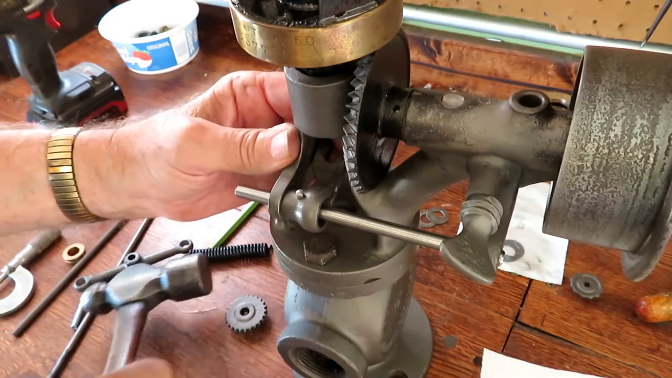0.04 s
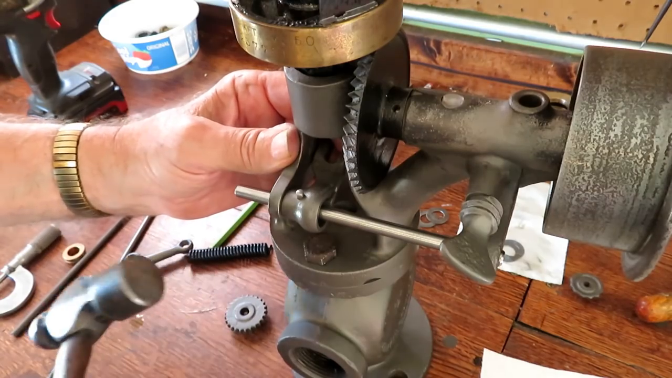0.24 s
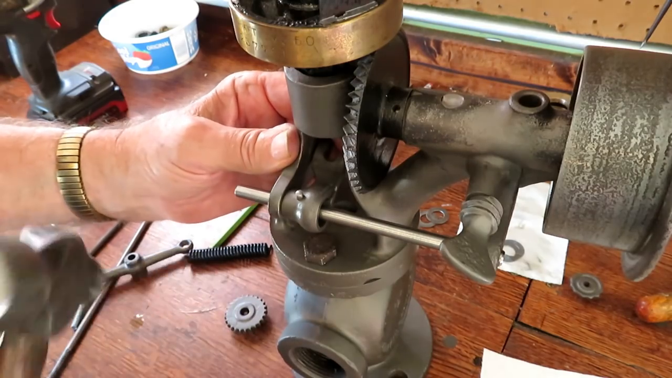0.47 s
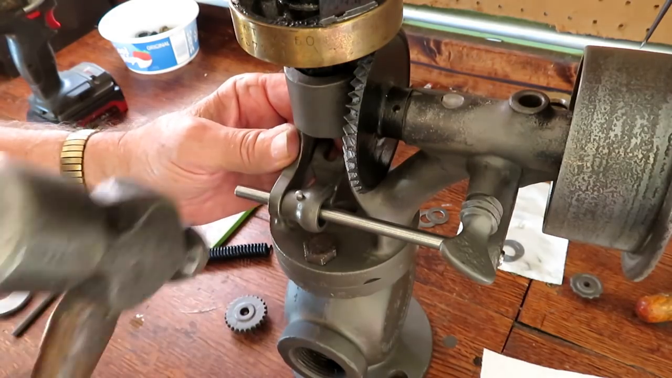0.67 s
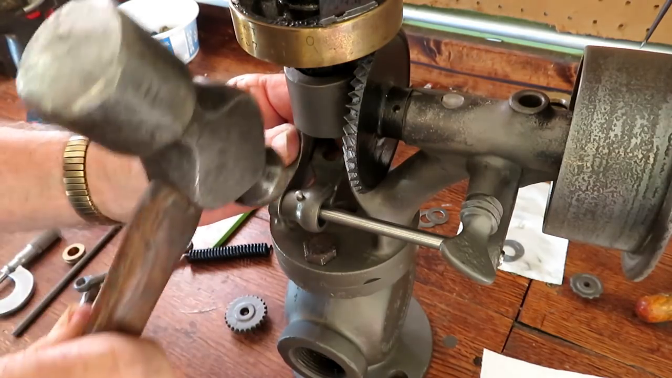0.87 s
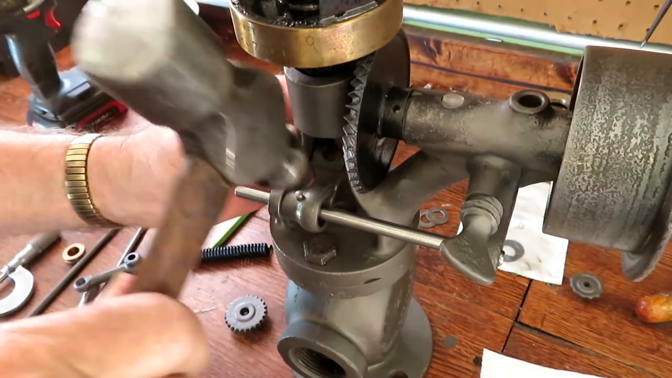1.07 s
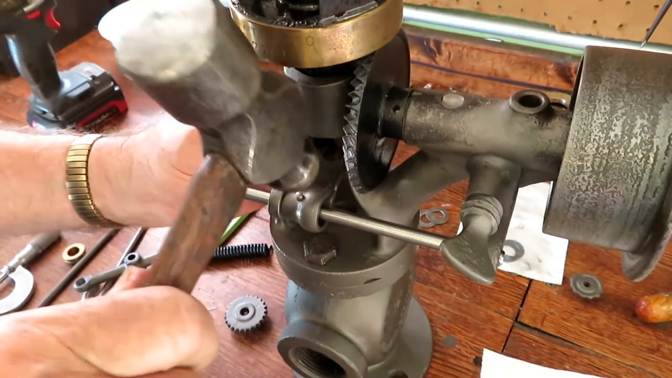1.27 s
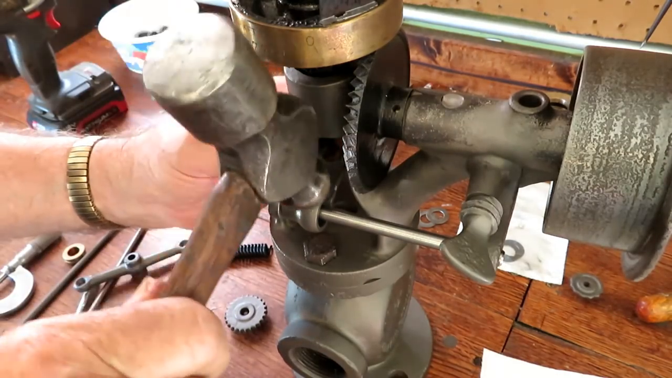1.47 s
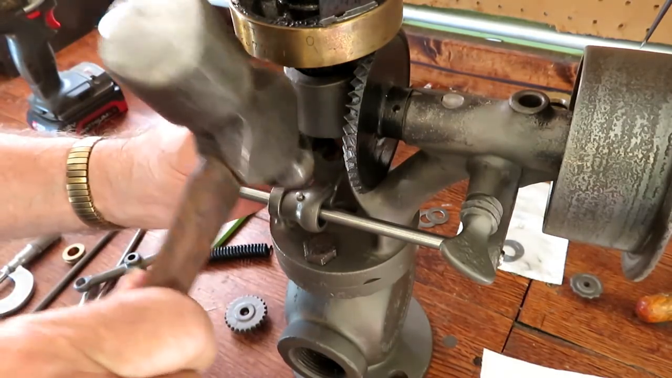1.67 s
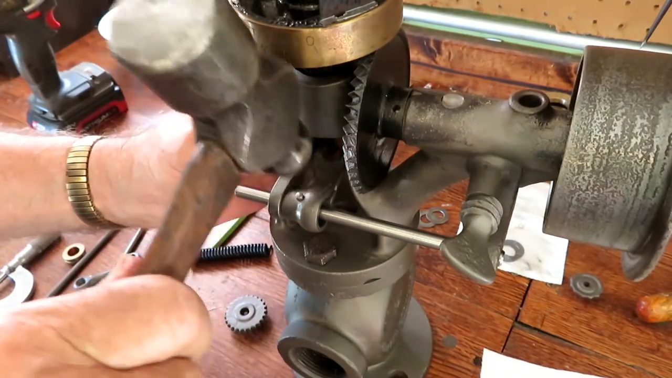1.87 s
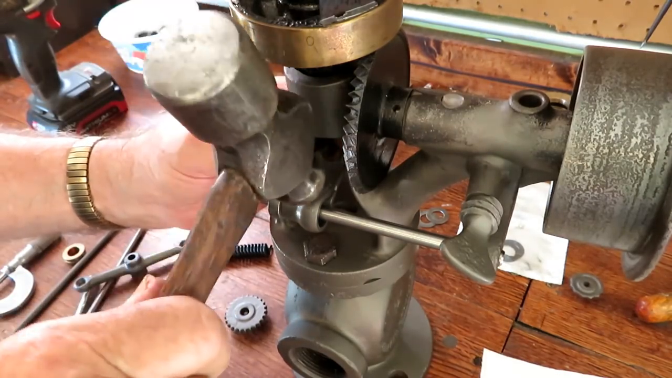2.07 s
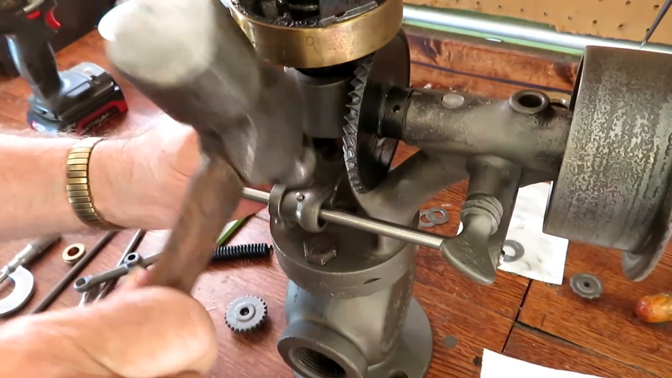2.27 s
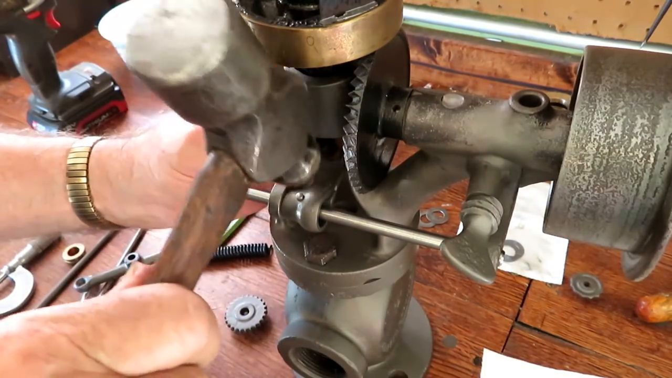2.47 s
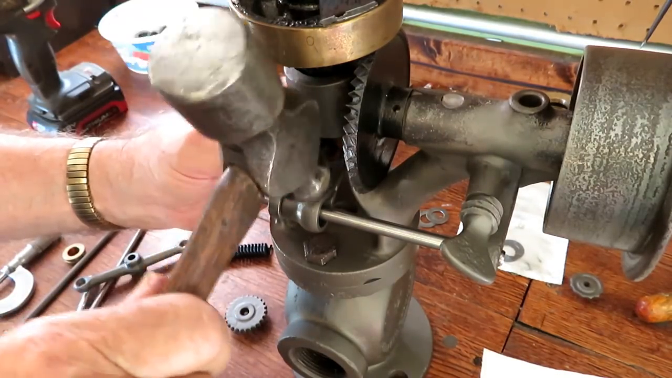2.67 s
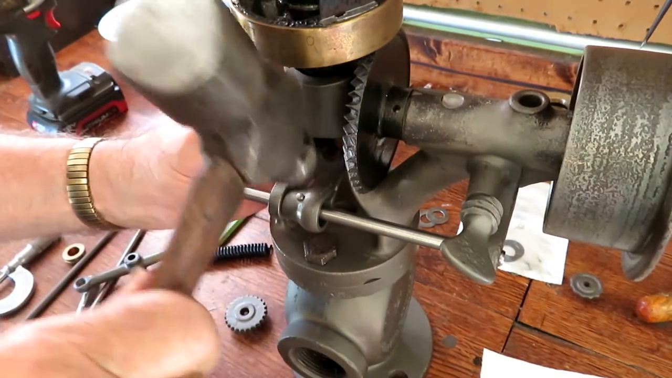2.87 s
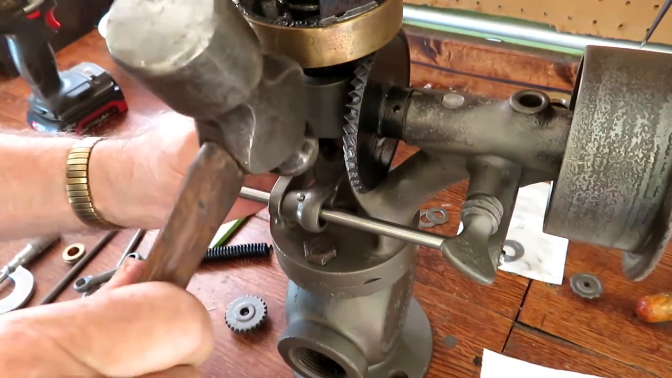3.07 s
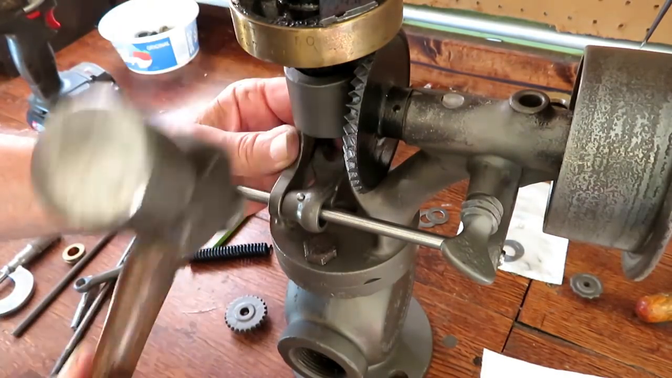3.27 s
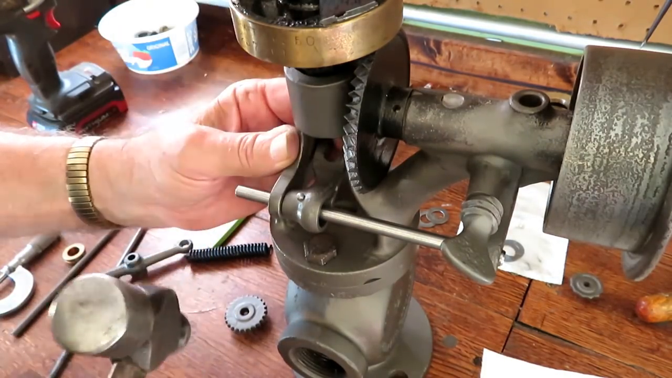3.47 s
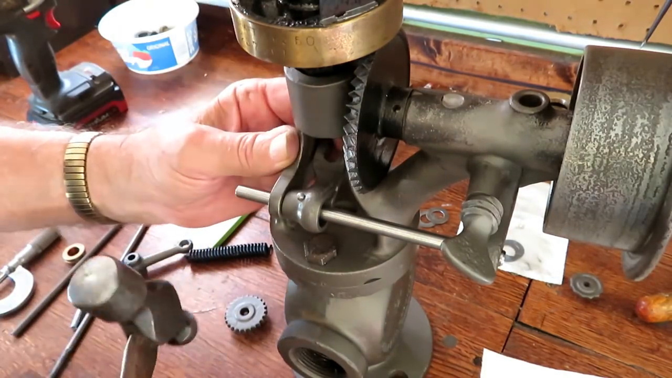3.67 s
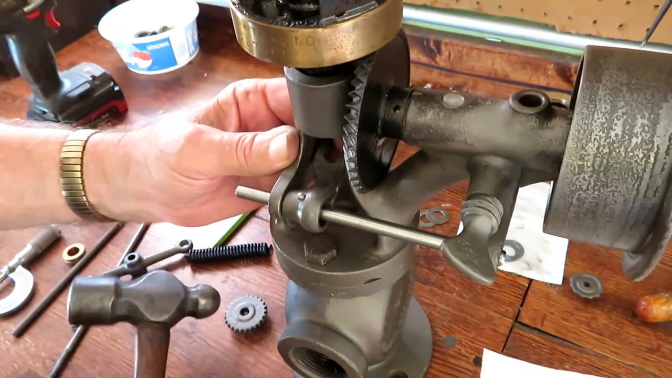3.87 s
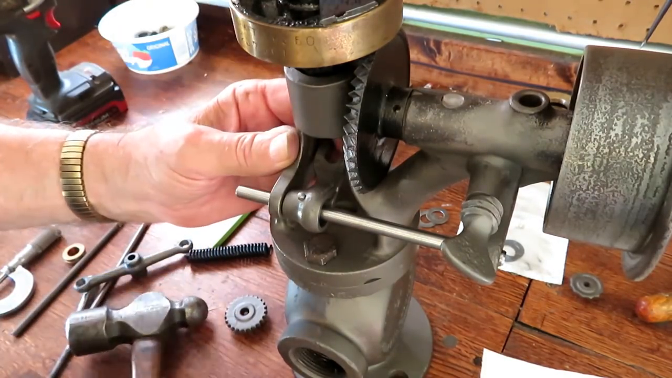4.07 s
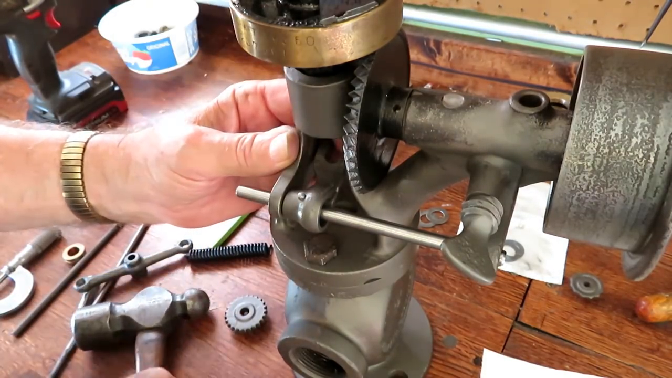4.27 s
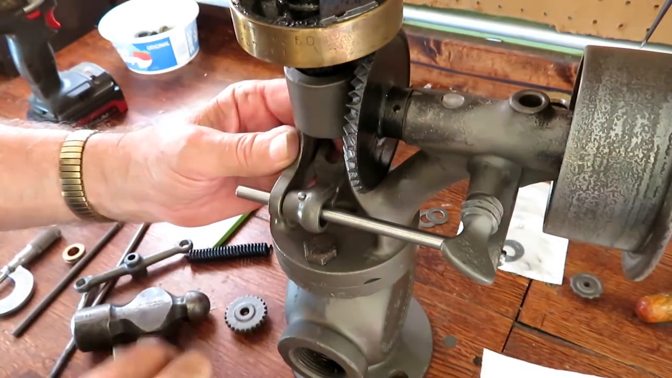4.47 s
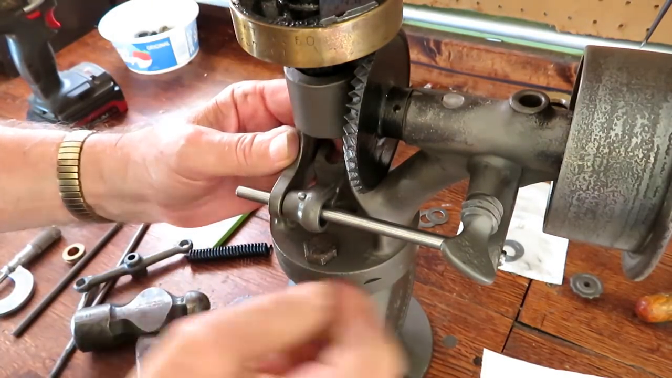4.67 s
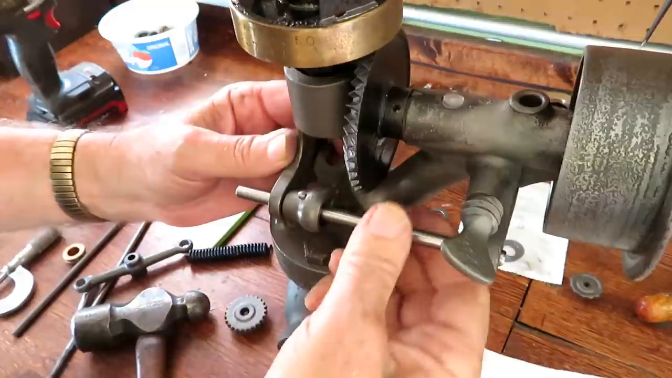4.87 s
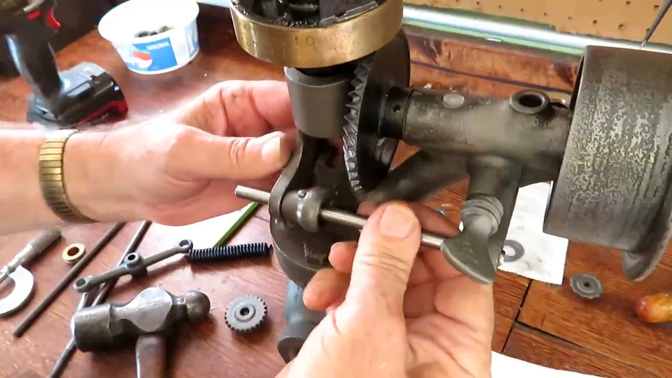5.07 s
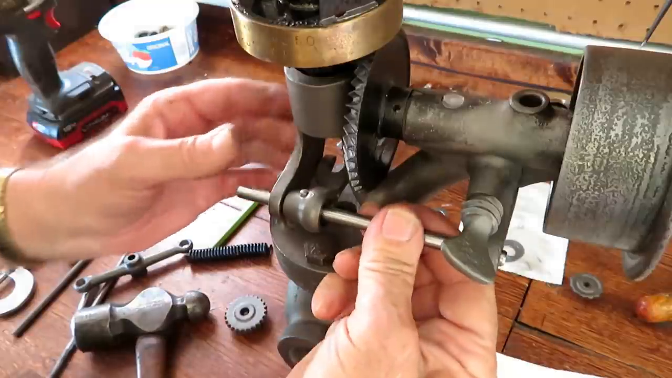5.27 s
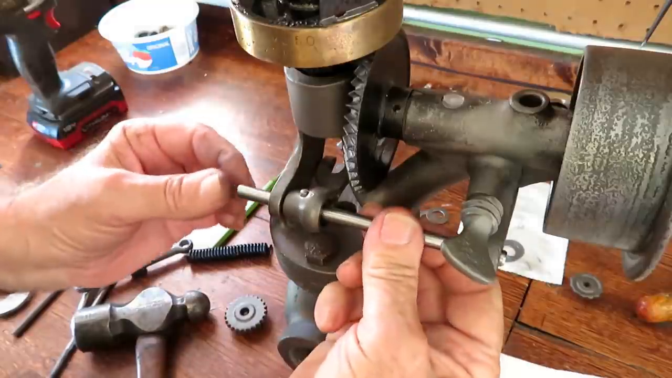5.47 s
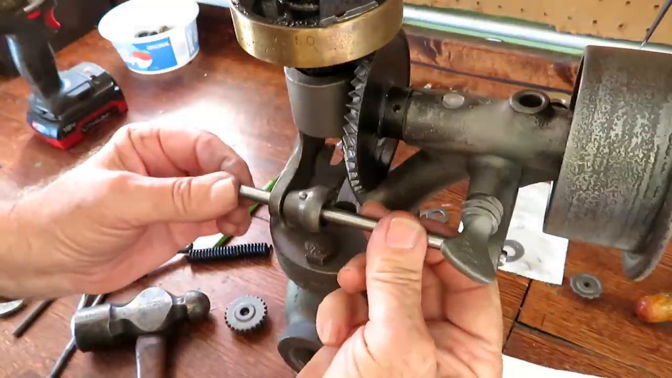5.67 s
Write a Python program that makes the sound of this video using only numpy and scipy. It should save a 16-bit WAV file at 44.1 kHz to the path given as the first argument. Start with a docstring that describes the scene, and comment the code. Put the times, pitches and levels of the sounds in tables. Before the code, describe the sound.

A close stereo microphone at a wooden bench in a lively shed, door open to the outdoors. From 0 to 1.2 s there is low far-traffic rumble and air, with a bird quickly repeating a thin rising whistled phrase around 2.3 to 3 kHz and tiny falling chips. From 1.2 to 3.0 s a hammer taps a cast-iron machine seven times, roughly every 0.3 s. The first is light and boomy; each next is generally harder and firmer: a bright, very short clack, a woody bench thud just behind, faint high steel ping, jingling loose parts and a grainy shed echo. Loud blows push the background down; it slowly recovers while a distant vehicle swells near 3.9 s. At 4.24 and 4.46 s the hammer is laid down: dull double knocks, the second pair sharper with rattling tools and brief trembling. From 4.8 s only quiet air and faint, distant, slightly sagging bird calls remain.

```python
"""Far traffic, open air and a bird's repeated phrase come in through an open door.
A hammer then taps a cast-iron machine seven times on a wooden bench, and is laid down with a rattle.
Struck things are sums of dying sine waves plus short noise bursts; the shed's echo is shaped noise.
Birds are bending sine waves, and the outdoors is random spectra.
A gain control turns everything down at loud moments and lets it creep back."""
import sys
import numpy as np
from scipy import signal
from scipy.io import wavfile
from scipy.ndimage import uniform_filter1d

SR = 44100
rng = np.random.default_rng(int(sys.argv[2]) if len(sys.argv) > 2 else 0)


def persist_wave(psi):
    """Save psi, clipped to +-1, as 16-bit WAV."""
    counts = np.round(np.clip(psi, -1, 1) * 32767).astype(np.int16)
    wavfile.write(sys.argv[1], SR, np.atleast_2d(counts).T)


def amplitude_ratio(level_db):
    """Convert a level in decibels to the matching linear amplitude (field) ratio."""
    exponent = np.asarray(level_db, float) / 20
    return 10 ** exponent


N = 253134  # length in samples


def evened(x):
    """Scales a signal to rms 1."""
    return x / np.sqrt(np.mean(x ** 2) + 1e-20)


def read(points, hz):
    """Reads a table's curve at the given frequencies, along a log-frequency axis."""
    f, value = np.transpose(points)
    return np.interp(np.log(hz + 1), np.log(f + 1), value)


def add(mix, s, sound):
    """Mixes a sound in, starting at time s in seconds."""
    part = mix[..., round(s * SR):][..., :sound.shape[-1]]
    part += sound[..., :part.shape[-1]]


# colour of the outdoor air, only its shape counts: [f/Hz, level/dB per Hz]
AIR_COLOUR = [(15, -44.5), (25, -10), (64, 4), (141, -6), (170, -4), (263, -0.5), (439, -15.5), (988, -16),
              (1840, -20.5), (2480, -21.5), (2690, -25.5), (2910, -23), (5000, -36), (13600, -51),
              (16000, -55)]
# how alike left and right are: [f/Hz, likeness from 0 to 1]
LEFT_RIGHT_LIKENESS = [(60, .9996), (180, .9992), (550, 0.94), (1650, 0.95), (4970, 0.62), (15000, 0.034)]
# far vehicles swell and fade: [t/s, half width/s, share of the full swell]
VEHICLE_PASSES = [(1.2, .4, 0.39), (3.9, 0.6, 1), (5.598, .45, 0.19)]
# gain of a full vehicle swell, before the layer is scaled: [f/Hz, level/dB]
VEHICLE_SWELL = [(40, .8), (80, 6), (250, 5.5), (1000, 8), (3000, -2.1)]


def outdoors():
    """Far traffic and air: random spectra with drifting patches and a slowly wandering level."""
    air_db = -37.5  # rms of the whole layer
    frames, hz = N // 256 + 5, np.fft.rfftfreq(1024, 1 / SR)
    a, b, c, d, patches = rng.standard_normal((frames, 513, 5)).T
    patches = evened(uniform_filter1d(uniform_filter1d(patches, 6, 0), 12, 1))
    t = np.arange(frames) * 256 / SR
    wander_hz = np.geomspace(.3, 6, 20)
    wander = evened(sum(np.sin(2 * np.pi * (f * t + rng.random())) / np.sqrt(f) for f in wander_hz))

    # the right side is part copy of the left, part noise of its own
    same = np.clip(read(LEFT_RIGHT_LIKENESS, hz), -1, 1)[:, None]
    left = a + 1j * b
    right = same * left + np.sqrt(1 - same ** 2) * (c + 1j * d)
    spectra = np.array([left, right])

    spectra *= amplitude_ratio(read(AIR_COLOUR, hz)[:, None] + 1.2 * patches + .7 * wander)
    nearness = sum(share / (1 + ((t - s) / width) ** 2) for s, width, share in VEHICLE_PASSES)
    spectra *= amplitude_ratio(read(VEHICLE_SWELL, hz)[:, None] * nearness)
    return amplitude_ratio(air_db) * evened(signal.istft(spectra, nperseg=1024, noverlap=768)[1][:, :N])


def whistle(length, start_hz, end_hz, db):
    """A fluttering near-sine that bends mostly early and grows fainter along the way."""
    u = np.arange(round(length * SR)) / (length * SR)  # 0 to 1 along the note
    noise = rng.standard_normal((2, len(u)))
    pitch_flutter, level_flutter = (evened(uniform_filter1d(uniform_filter1d(v, 130), 130)) for v in noise)
    hz = (start_hz + (end_hz - start_hz) * u ** .6) * (1 + .009 * pitch_flutter)
    level = np.sqrt(2) * amplitude_ratio(db + 4.65 * level_flutter - 4.4 * u)
    return level * np.sin(2 * np.pi * np.cumsum(hz) / SR) * signal.windows.tukey(len(u), .3)


# starts of one bird's repeated phrase: [t/s, level/dB]
PHRASE_STARTS = [(-.105, -51.5), (0.133, -52.5), (0.364, -51.5), (.61, -52), (0.886, -52.5), (1.13, -54.5)]
# notes of the phrase: [delay t/s, length t/s, start f/Hz, end f/Hz, level/dB against the phrase]
PHRASE_NOTES = [(.001, 0.061, 2283, 2473, 3), (.055, 0.12, 2495, 2580, -0.5),
                (.108, 0.13, 2840, 2845, -3.5), (0.183, 0.044, 2820, 2934, 1),
                (0.246, 0.17, 2980, 2940, -6)]
# short falling chips: [t/s, level/dB]
CHIP_CALLS = [(.214, -62), (.449, -51), (.724, -53.5), (.984, -58)]
# slightly sagging calls of farther birds: [t/s, length t/s, start f/Hz, level/dB]
FAR_CALLS = [(4.84, .11, 3280, -60), (4.95, .11, 3380, -59), (4.95, .1, 3220, -60), (4.93, .08, 2860, -61),
             (5.13, .15, 2320, -56), (5.21, .15, 2880, -54), (5.28, .1, 2680, -60), (5.26, .08, 3150, -61),
             (5.62, .11, 2250, -53), (5.69, .05, 2800, -56)]


def birds():
    """One bird's repeated phrase, chips and some farther calls, smeared by echoes in the yard."""
    song_end_s, sag_hz_per_s = 1.2, 250
    out = np.zeros(N)
    for start, phrase_db in PHRASE_STARTS:
        for delay, length, start_hz, end_hz, db in PHRASE_NOTES:
            if 0 <= start + delay < song_end_s:
                add(out, start + delay, whistle(length, start_hz, end_hz, phrase_db + db))
    for s, db in CHIP_CALLS:
        add(out, s, whistle(0.01564, 4123, 3106, db))
    for s, length, hz, db in FAR_CALLS:
        add(out, s, whistle(length, hz, hz - sag_hz_per_s * length, db))
    yard = rng.standard_normal((2, 6000)) * amplitude_ratio(-60 * np.arange(6000) / SR / 0.17)  # t60 0.17 s
    yard /= np.linalg.norm(yard[0])
    return out + amplitude_ratio(-7.0) * signal.fftconvolve(out[None], yard, axes=1)[:, :N]


def band(x, lo_hz, hi_hz):
    """Keeps only what lies between two frequencies, with steep sides."""
    return signal.sosfilt(signal.butter(3, [lo_hz, hi_hz], "band", fs=SR, output="sos"), x)


def burst(rise_s, channels):
    """Noise whose level peaks at rise_s and then dies away within a few ms."""
    u = np.arange(1500) / SR / rise_s
    return rng.standard_normal((channels, 1500)) * u * np.exp(1 - u)


def ring(modes, spread_db, detune):
    """Sum of dying sine waves; each blow lands a little elsewhere and weights and tunes them anew."""
    t = np.arange(SR // 2)[:, None] / SR
    hz, db, t60 = np.transpose(modes)
    a, b = rng.standard_normal((2, len(modes)))
    level = amplitude_ratio(db + spread_db * a - 60 * t / t60)
    return (level * np.sin(2 * np.pi * hz * (1 + detune * b) * t)).sum(1)


def peak1(x):
    """Scales a signal to peak 1."""
    return x / abs(x).max()


# ringing modes of the bench top, before the tilt: [f/Hz, level/dB, t60 t/s]
BENCH_MODES = [(82.5, -5.5, 0.44), (114, -2, 0.26), (160.2, 2, 0.099), (193.4, -1, 0.14), (266, -10, 0.24),
               (337, 1, 0.025), (389, -2, 0.058), (503, -3, 0.03), (639, -11, 0.017), (795, -5.5, 0.012),
               (980, -24, 0.052), (1118, -20, 0.036), (1370, -26, 0.008)]


def thud(tilt_db, contact_s, low_hz):
    """The bench top is pushed down and rings; where it is struck tilts its modes (dB per octave)."""
    modes = [(hz, db + tilt_db * np.log2(hz / 250), t60) for hz, db, t60 in BENCH_MODES]
    u = np.arange(400) / SR / contact_s
    push = u * np.exp(-u)
    pushed_down = -signal.fftconvolve(ring(modes, 1.2, .008), push)
    return peak1(band(pushed_down, low_hz, 4000))  # the bench radiates no deep bass


# how long the shed rings: [f/Hz, t60 t/s]
SHED_DECAY = [(60, 0.25), (160, 0.54), (420, 0.49), (1100, 0.39), (3000, 0.59), (8000, 0.62), (15000, 0.8)]
# colour of the shed's answer, only its shape counts: [f/Hz, level/dB]
SHED_ANSWER = [(60, -8.5), (300, 4.5), (1000, 16), (3000, 4), (8000, -26), (11000, -41), (14500, -36.5),
               (16000, -63.5)]


def shed(x):
    """Dense reflections and shaken tools, new for each blow; each band dies at its own speed."""
    same, a, b = rng.standard_normal((3, 30000))
    treble = np.diff(b, prepend=0)
    left = same + 0.021 * a + 0.79 * treble
    right = same - 0.029 * a - 0.38 * treble
    hz, t, z = signal.stft(np.array([left, right]), SR, nperseg=256)
    wall_echo = 1 + .5 * np.exp(-((t - .14) / 0.0054) ** 2)  # a late bump in level
    z = z * amplitude_ratio(read(SHED_ANSWER, hz)[:, None] - 60 * t / read(SHED_DECAY, hz)[:, None]) * wall_echo
    patches = uniform_filter1d(uniform_filter1d(rng.standard_normal(z.shape[1:]), 4, 0), 4, 1)
    z *= amplitude_ratio(1.6 * evened(patches))  # a grainy tail
    fade_in = np.clip(np.arange(30000) / SR / 0.0019 - .4, 0, 1)
    tail = signal.istft(z, SR, nperseg=256)[1][:, :30000] * fade_in
    return signal.fftconvolve(np.atleast_2d(x), tail / np.linalg.norm(tail[0]), axes=1)


# taps on the casting: [t/s, crack level/dB, bench thud level/dB]
TAP_BLOWS = [(1.217, -13, -7), (1.522, -0.5, -4.5), (1.803, 1.5, -2.5), (2.092, 3, -1), (2.403, 2.5, 0.5),
             (2.703, 4.5, 1), (3.003, 5.5, 4)]
# short modes of the casting: [f/Hz, level/dB, t60 t/s]
CASTING_MODES = [(1550, -10, .012), (1900, -5, .01), (2140, -2, .013), (2780, -2, .015), (3050, -5, .012),
                 (3720, 0, .015), (4240, 0, .016), (4800, -7, .01), (5600, -11, .01), (6400, -13, .01),
                 (7350, -14, .009), (8800, -13, .009), (11900, -13, .009), (12700, -9, .01),
                 (13900, -12, .009), (14600, -7, .01), (15600, -12, .008)]
# the whole frame jumps at once, against the thud: [f/Hz, level/dB against the thud, t60 t/s]
FRAME_JOLT = [(346, -11, 0.01)]
# loose rods and gears on the bench: [f/Hz, level/dB against each other, t60 t/s]
LOOSE_PARTS = [(3700, -6, .25), (4230, -4, .3), (5600, -7, .3), (6800, -10, .25), (8100, -13, .3),
               (8750, -14, .3), (10500, -17, .3), (11200, -18, .25), (12550, -20, .25), (14000, -21, .2),
               (14500, -20, .2)]


def taps():
    """Steel on iron chatters for a few ms; the bench follows a moment later and loose parts ring."""
    # as the part seats, the thud tilts from boomy to firm (dB per octave)
    slack_tilt_db, seated_tilt_db, slack_left = -9, 1.26, 0.55  # share of slack left after each tap
    loose_db, loose_growth = -37, 3  # level at a 0 dB crack, and growth in dB per dB of crack
    thud_lag_s = .0046
    out, sides = np.zeros((2, N)), np.array([[1], [-1]])
    for k, (s, crack_db, thud_db) in enumerate(TAP_BLOWS):
        tilt_db = seated_tilt_db + (slack_tilt_db - seated_tilt_db) * slack_left ** k
        a, b, c = burst(0.00097, channels=3)
        chatter = a + 9. * signal.unit_impulse(1500, 20)
        crack = peak1(signal.fftconvolve(chatter, ring(CASTING_MODES, 1.2, .004))[:3000])
        # noise stands in for countless faint modes
        dense = amplitude_ratio(-5.5) * band(burst(0.0027, channels=1), 2100, 4960) + amplitude_ratio(-16.0) * band(b, 1800, 18000)
        # treble of opposite sign left and right
        apart = amplitude_ratio(-19.5) * sides * np.diff(band(c, 2200, 15300), prepend=0)
        bench = amplitude_ratio(thud_db) * thud(tilt_db, 0.00029, 134.5)

        add(out, s, amplitude_ratio(crack_db) * (band(crack[:1500], 1700, 21000) + dense + apart))
        bare_click = signal.lfilter([1, -.9], [1], [1, 0])
        add(out, s, amplitude_ratio(crack_db + 18) * shed(bare_click))
        add(out, s, amplitude_ratio(thud_db) * band(ring(FRAME_JOLT, 3.0, .05), 150, 730))
        add(out, s + thud_lag_s, bench)
        add(out, s + thud_lag_s, amplitude_ratio(-5.0) * shed(bench))

        shake = evened(uniform_filter1d(rng.standard_normal(SR // 2), 120))  # parts jostle as they ring
        loose_level = amplitude_ratio(loose_db + loose_growth * crack_db)
        add(out, s, loose_level * (.6 + shake) * ring(LOOSE_PARTS, 2.5, .01))
    return out


# faint high ring of the steel head at some blows: [t/s, level/dB]
PING_TIMES = [(1.235, -46), (1.822, -39), (2.112, -37), (3.02, -42), (4.246, -55), (4.48, -54)]
# modes of the steel head: [f/Hz, level/dB against the ping, t60 t/s]
HEAD_MODES = [(5740, 0, .2), (7400, -8, .18), (11300, -18, .15)]


def pings():
    """Faint high ring of the steel head at some blows: dying sine waves, faded in over about 9 ms."""
    out = np.zeros(N)
    fade_in = np.minimum(np.arange(SR // 2) / 400, 1)
    for s, db in PING_TIMES:
        add(out, s, amplitude_ratio(db) * ring(HEAD_MODES, 0.57, 0.0012) * fade_in)
    return out


# the hammer is laid down and rocks:
# [t/s, knock level/dB, thud tilt/dB per octave, rattle level/dB, rise t/s]
LAY_DOWN_KNOCKS = [(4.24, -3, -2, -17, 0.0014), (4.295, -7, -2, -28, 0.0022),
                   (4.461, -0.5, 6.5, 0.5, 0.0023), (4.504, -8.5, 5, -10, 0.00373)]


def knocks():
    """The head meets the wood, rocks and rattles loose tools, which keep trembling on the wood."""
    rattle_top_hz, rattle_octaves_per_db = 1600, .04  # a louder rattle is brighter
    jitter_db, jitter_t60_s = -30, .3  # the trembling, against the knock
    out = np.zeros((2, N))
    for s, db, tilt_db, rattle_db, rise_s in LAY_DOWN_KNOCKS:
        top_hz = rattle_top_hz * 2 ** (rattle_octaves_per_db * rattle_db)
        scrape, rattle = burst(rise_s, channels=2)
        contact = scrape + 8 * signal.unit_impulse(1500, round(rise_s * SR))
        knock = amplitude_ratio(db) * peak1(signal.fftconvolve(thud(tilt_db, 0.00009, 195), contact))
        dulled = signal.lfilter(*signal.butter(2, top_hz, fs=SR), band(rattle, 410, 8000))
        add(knock, 0, amplitude_ratio(rattle_db) * dulled)
        add(out, s, knock)
        add(out, s, amplitude_ratio(-5.5) * shed(knock))

        grain, lumps = rng.standard_normal((2, SR // 4))
        fade_db = jitter_db - 60 * np.arange(SR // 4) / SR / jitter_t60_s
        fade_db = fade_db + 4 * evened(uniform_filter1d(lumps, 300))
        add(out, s, amplitude_ratio(db + fade_db) * band(grain, 1900, 3600))
    return out


def scene():
    """Blows over the birds and the outdoors."""
    return taps() + knocks() + pings() + birds() + outdoors()


def roll_off(x):
    """The treble ends steeply here."""
    return signal.sosfilt(signal.butter(12, 16630, fs=SR, output="sos"), x)


# the ducking is uneven, so it also dulls: [f/Hz, multiplier of the ducking in dB]
DUCKING_SHARE = [(30, 1.6), (100, 1.614), (1000, 1.26), (3000, 2), (8000, 1.79), (14000, 2.14)]


def record(dry):
    """Gain control sinks at loud moments and creeps back; then a soft limit, a treble and a bass cut."""
    hz, t, z = signal.stft(dry, SR, nperseg=256)
    power = (abs(z) ** 2).sum(1).mean(0)
    over_db = np.maximum(10 * np.log10(power + 1e-12) + 26, 0)  # excess over -26 dB
    duck_db, step = np.zeros(len(t)), t[1]
    for k in range(1, len(t)):
        # sinks toward 0.71 of the excess with a 0.055 s time constant, creeps back steadily
        fall = max(0.71 * over_db[k - 1] - duck_db[k - 1], 0) * min(step / 0.055, 1)
        duck_db[k] = max(duck_db[k - 1] + fall - 4.91 * step, 0)
    gain = amplitude_ratio(-read(DUCKING_SHARE, hz)[:, None] * duck_db)
    ducked = signal.istft(z * gain, SR, nperseg=256)[1][:, :N]
    limited = 1.784 * np.tanh(ducked / 1.05)
    treble_cut = signal.oaconvolve(limited, signal.firwin(255, 16300, fs=SR)[None], "same")
    finished = signal.lfilter(*signal.butter(2, 32, "high", fs=SR), treble_cut)
    return roll_off(finished)


dry = scene()
out = record(dry)
persist_wave(out)
```